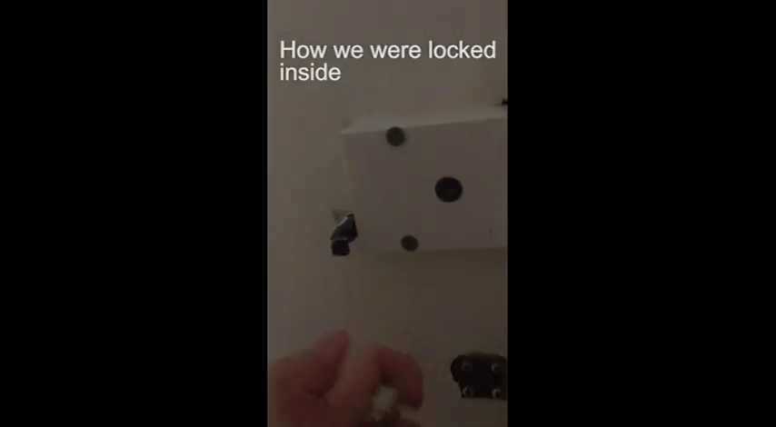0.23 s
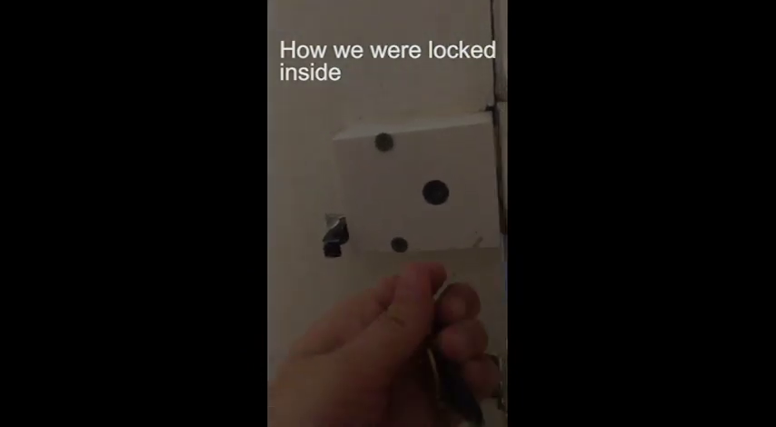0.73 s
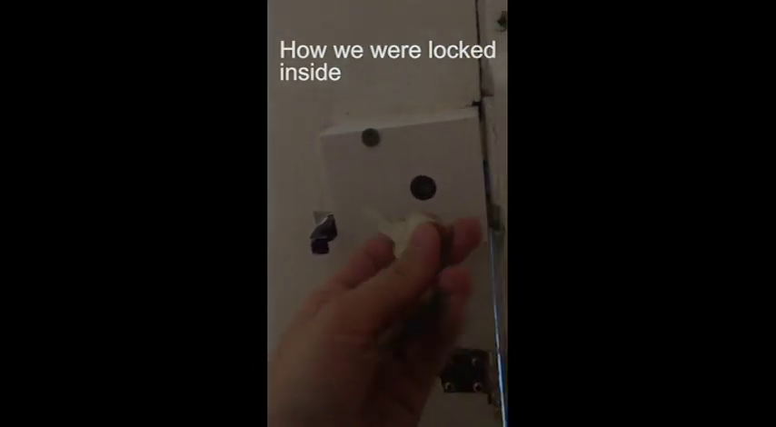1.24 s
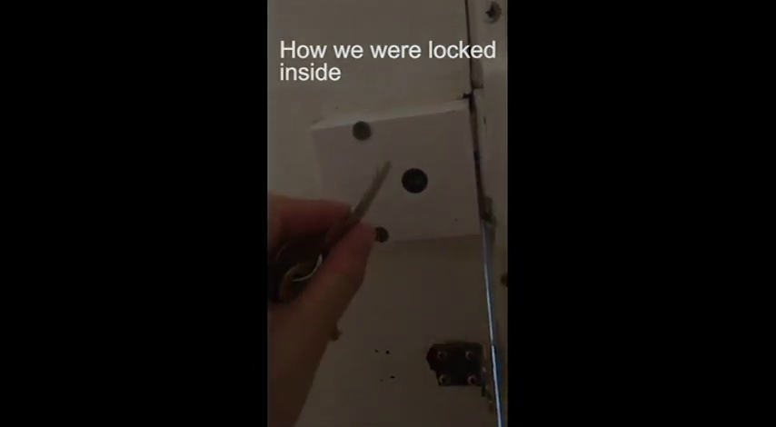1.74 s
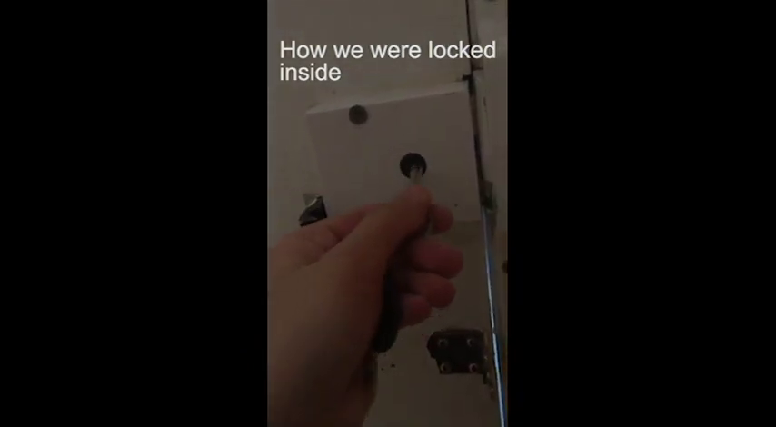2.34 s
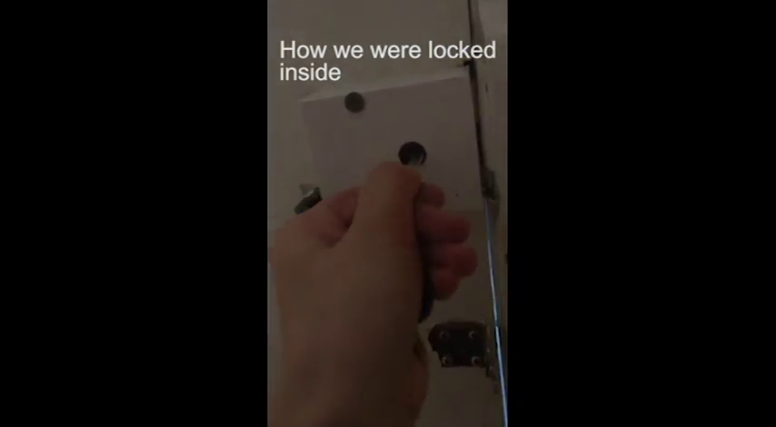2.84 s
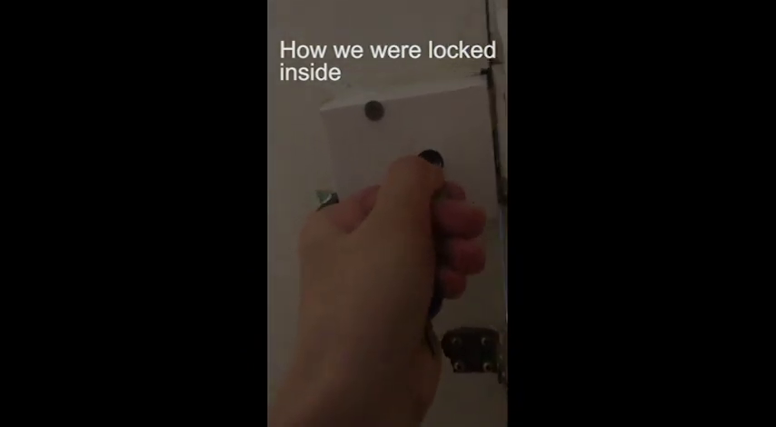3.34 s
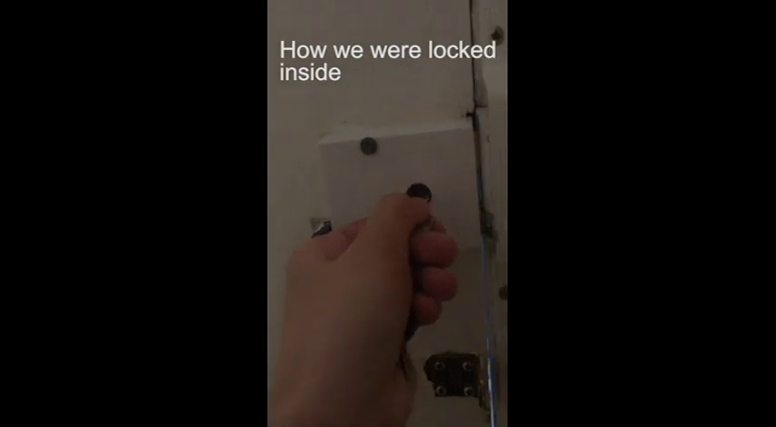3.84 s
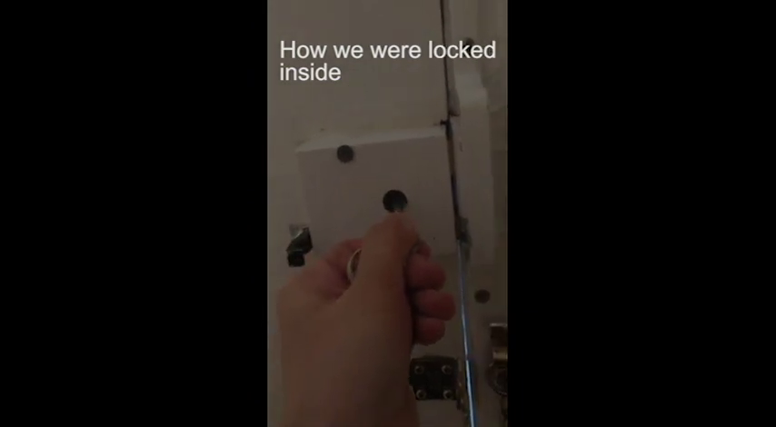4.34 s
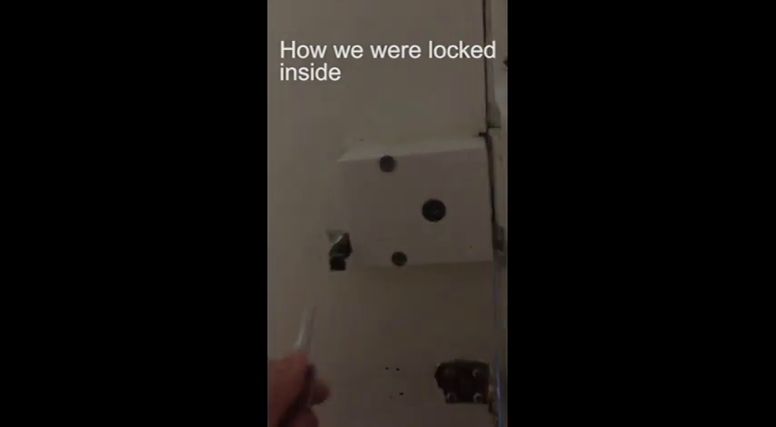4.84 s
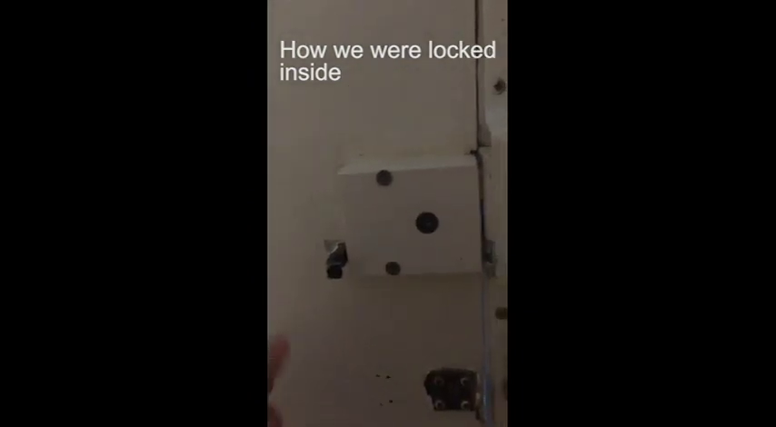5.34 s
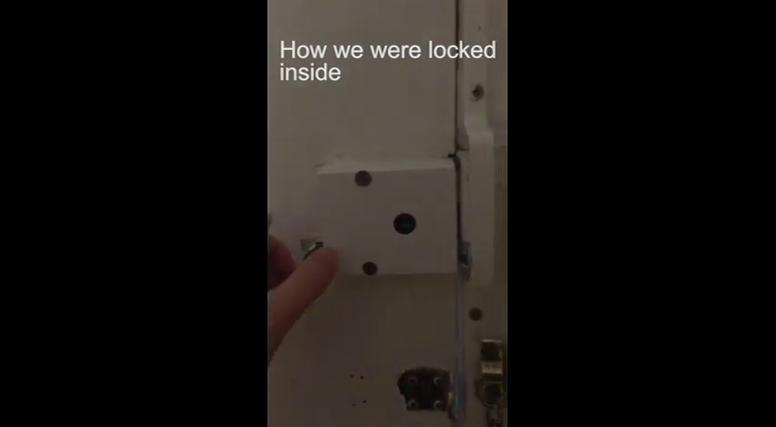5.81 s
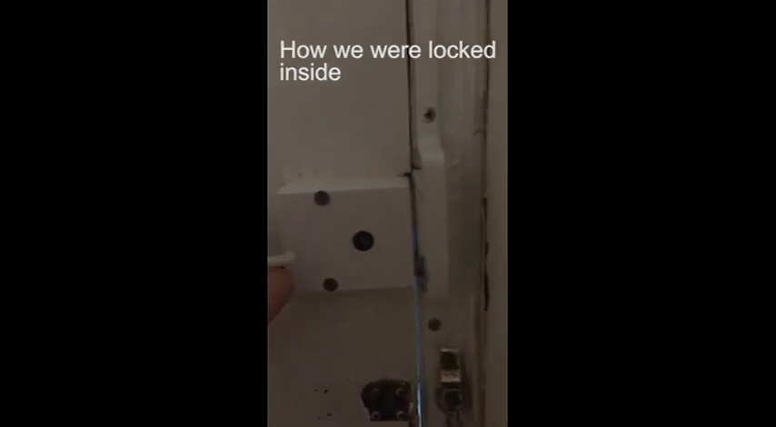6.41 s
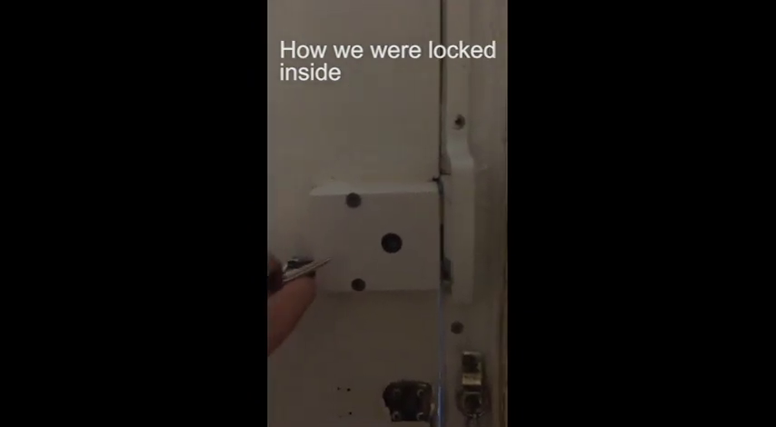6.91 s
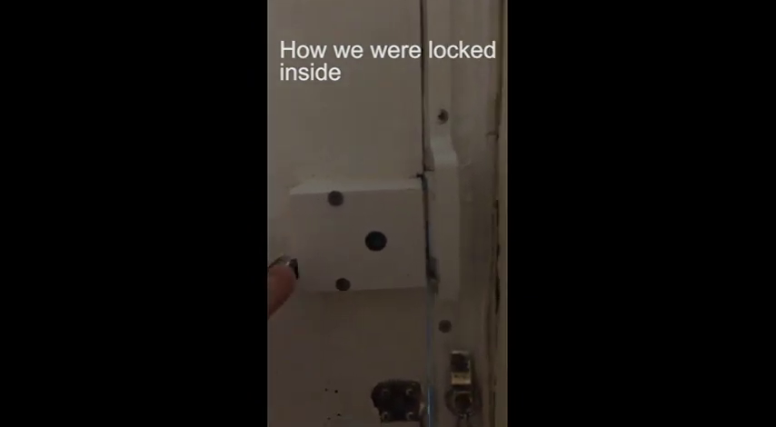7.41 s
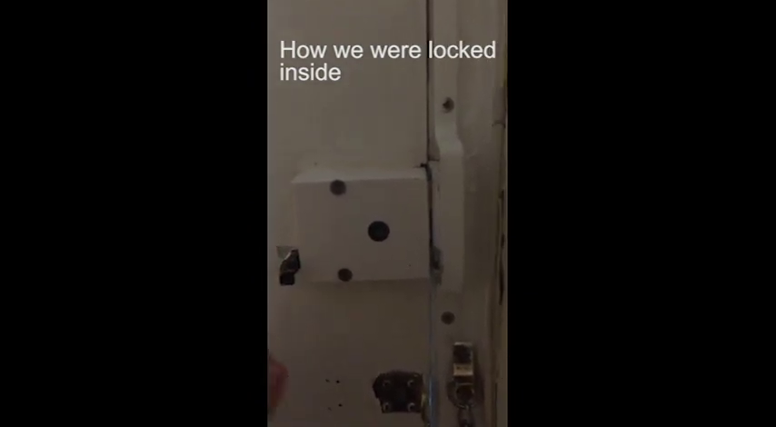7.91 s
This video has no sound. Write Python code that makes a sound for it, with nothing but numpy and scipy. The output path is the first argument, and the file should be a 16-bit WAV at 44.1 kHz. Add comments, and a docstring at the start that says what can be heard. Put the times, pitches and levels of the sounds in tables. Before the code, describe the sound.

Keys jingle in the hand, one is worked into a door lock, the wooden door jolts, and the latch clacks hard in a small hallway.

```python
"""Key in a rim lock

A bunch of keys is sorted in the hand, and one is forced round in the rim lock of a wooden door. The door
shudders, the latch snaps back, the key is pulled out and the lock's catch clacks in a small hard hallway.
Impacts are noisy contact forces driving damped modes, friction is noise gated by tiny slips, and the
hallway is convolution with decaying reflections. Low rumble and still air lie beneath.
"""
import sys
import numpy as np
from scipy import signal
from scipy.fft import rfft, irfft
from scipy.io import wavfile

SR = 44100
rng = np.random.default_rng(int(sys.argv[2]) if len(sys.argv) > 2 else 0)


def store_wav(level_fs):
    """Save 16-bit WAV to argv[1]."""
    pcm = np.round(np.clip(np.atleast_2d(level_fs), -1, 1) * 32767)
    wavfile.write(sys.argv[1], SR, pcm.T.astype(np.int16))


N = 359900  # length in samples


def amp(db):
    """Logarithmic level: 20 dB is a factor of ten in amplitude."""
    return 10 ** (np.asarray(db) / 20)


def rms(x):
    """Effective value: the root of the mean square, kept above zero."""
    return np.sqrt(np.mean(x ** 2) + 1e-24)


def read(points, hz):
    """Interpolation on a log-frequency axis, along which hearing judges pitch."""
    f, value = np.transpose(points)
    return np.interp(np.log(hz + 1), np.log(f), value)


def add(mix, s, sound):
    """Superposition: adds a sound into the mix, in place, from s seconds on."""
    part = mix[max(round(s * SR), 0):][:len(sound)]
    part += sound[:len(part)]


def noise(spectrum):
    """Spectral shaping: white noise filtered to a given colour, at rms 1."""
    white = rng.standard_normal(N)
    gain = amp(read(spectrum, np.fft.rfftfreq(N, 1 / SR)))
    x = irfft(rfft(white) * gain, N)
    return x / rms(x)


def strokes(rows):
    """Power summation: overlapping hand movements, each swelling to a height and fading, as one gain."""
    t = np.arange(N) / SR
    power = sum(amp(db - 20 * abs(t - s) / fade_s) ** 2 for s, db, fade_s in rows)
    return np.sqrt(power)


# still air, relative spectral density: f/Hz, level/dB
AIR_SPECTRUM = [(20, -23), (50, -2.5), (95, 8), (130, -2.5), (240, -5), (400, -20), (1000, -31),
                (3000, -33), (8000, -38.5), (16000, -43.5)]


def air():
    """Stationary noise: the steady background colour of the hallway, at a fixed level."""
    return amp(-56.5) * noise(AIR_SPECTRUM)


# reverberation time of the hallway: f/Hz, t60/s
HALL_T60 = [(60, 0.62), (150, .75), (400, 0.69), (1000, 0.71), (2500, 0.54), (5000, 0.5), (9000, 0.32),
            (15000, 0.38)]


def hall(x, early_db=5.0, early_s=0.022):
    """Reverberation: dense reflections, strongest early from near walls, decay at a rate set by frequency."""
    spacing = 12  # samples; one reflection falls in each slot
    at = np.arange(200, SR - spacing, spacing)
    taps = np.zeros(SR)
    taps[at + rng.integers(0, spacing, len(at))] = rng.choice([-1., 1.], len(at))
    taps *= 1 + amp(early_db) * np.exp(-np.arange(SR) / SR / early_s)
    hz, t, z = signal.stft(taps, SR, nperseg=256)
    decay = amp(-60 * t / read(HALL_T60, hz)[:, None])
    tail = signal.istft(z * decay, SR, nperseg=256)[1]
    return signal.fftconvolve(x, tail / np.linalg.norm(tail))[:N]


# rumble of the leaf, relative spectral density: f/Hz, level/dB
RUMBLE_SPECTRUM = [(20, -24), (42, -2), (60, -5.5), (95, -12), (130, -14), (250, -20.5), (500, -55.5),
                   (1500, -79)]
# the hand leans on the door: t/s at the height, level/dB, time/s to fade by 20 dB
HAND_LEANS = [(.47, -40, .45), (3.18, -28, .2), (4.45, -46, .4), (5.18, -50, .25), (5.82, -36, .1),
              (6.92, -28, .2), (7.23, -32, .25), (8.07, -53, .15)]
SWAY_DB, SWAY_RISE_S, SWAY_FALL_DB_PER_S = -7, .03, 54  # the leaf's rumble after a jolt


def rumble(soft_gain=.8):
    """Forced vibration: the leaf rumbles under the hand and after each jolt, most after soft heavy ones."""
    t = np.arange(2 * SR) / SR
    power = strokes(HAND_LEANS) ** 2
    sway = (1 - np.exp(-t / SWAY_RISE_S)) * amp(SWAY_DB - SWAY_FALL_DB_PER_S * t)
    for s, db, hardness_db in DOOR_JOLTS:
        add(power, s, (amp(db - soft_gain * hardness_db) * sway) ** 2)
    return np.sqrt(power) * noise(RUMBLE_SPECTRUM)


def rub(moves, spectrum, catches_per_s, spread_db, slip_s):
    """Stick-slip friction: surfaces catch and let go in many tiny slips at random times."""
    sizes = amp(spread_db * np.minimum(rng.exponential(1, N), 3))
    slips = (rng.random(N) < catches_per_s / SR) * sizes
    grit = signal.lfilter([1], [1, -np.exp(-1 / (slip_s * SR))], slips)  # each slip dies exponentially
    return strokes(moves) * noise(spectrum) * grit / rms(grit)


# fingers and sleeve brush the door: t/s at the height, level/dB, time/s to fade by 20 dB
DOOR_BRUSHES = [(1.08, -57, .07), (2.79, -46, .1), (2.99, -45, .3), (3.5, -53, .15), (3.88, -58, .3),
                (4.77, -57, .1), (5.15, -58, .15), (6.55, -39, .55)]
# their colour, relative spectral density: f/Hz, level/dB
BRUSH_SPECTRUM = [(120, -17), (250, -1.5), (450, 4.5), (800, -3), (1500, -9), (2800, -13), (5000, -26.5),
                  (12000, -43.5)]


def brushing():
    """Soft friction: fingers and sleeve on wood, with long slips of nearly equal size."""
    return amp(-4.5) * rub(DOOR_BRUSHES, BRUSH_SPECTRUM, catches_per_s=420, spread_db=1.0, slip_s=.006)


# the blade slides over fingers, keys and lock mouth: t/s at the height, level/dB, time/s to fade by 20 dB
BLADE_SLIDES = [(.01, -39, .09), (.26, -51, .15), (.92, -66, .2), (1.08, -53, .05), (1.39, -58, .17),
                (1.57, -55, .05), (1.81, -52, .07), (2.06, -42, .07), (5.35, -43, .06)]
# its colour, relative spectral density: f/Hz, level/dB
SLIDE_SPECTRUM = [(700, -33.5), (1500, -16), (2300, -6), (4000, 2.5), (6800, -0.5), (10000, -5),
                  (16000, -12)]


def sliding():
    """Hard friction: the key blade scrapes in short slips of uneven size."""
    return amp(-4.0) * rub(BLADE_SLIDES, SLIDE_SPECTRUM, catches_per_s=350, spread_db=4.5, slip_s=.0012)


LEAD_S = .004  # a blow grazes for this long before it lands


def ring(modes, t, crack_db, detune):
    """Impulse response: a broad crack and damped modes that vary with grip and point of contact."""
    hz, width, db = np.transpose(modes)[:, :, None]
    hz = hz * (1 + detune * rng.standard_normal(hz.shape))
    place = rng.uniform(.6, 1.4, hz.shape) * rng.choice([-1, 1], hz.shape)
    size = place * amp(db) * 2 * np.pi * width / SR  # a wider mode starts stronger
    response = (size * np.exp(-np.pi * width * t) * np.sin(2 * np.pi * hz * t)).sum(0)
    response[0] += amp(crack_db)
    return response


def chatter(t, spray, t60, first, graze_db, rise, loose_db, loose_s):
    """Contact force: a graze, the main contact with a spray of tiny rebounds, then loose parts buzzing out."""
    t60 = max(t60, .002)
    after = np.maximum(t - LEAD_S, 0)
    graze = amp(graze_db) * (t / LEAD_S) ** 2 * (t < LEAD_S)
    dying = amp(-60 * after / t60) + amp(loose_db - 60 * after / loose_s)
    build = 1 - np.exp(-after / (abs(rise) * t60))  # long contacts build slowly
    force = spray * (graze + dying * build)
    force[int(LEAD_S * SR)] += first  # stands out most in brief contacts
    return force


def strikes(hits, modes, edges, voice, size, attack_s, crack_db, detune, pivot_hz, **contact):
    """Source-filter model: contact force convolved with modes; hardness tilts the bands about the pivot."""
    t = np.arange(size) / SR
    out = np.zeros(N)
    bands = [signal.butter(4, e, "bandpass", fs=SR, output="sos") for e in edges]
    octaves = np.log2(np.array(edges) / pivot_hz).mean(1)  # band centres from the pivot
    for s, db, hardness_db, chatter_s in hits:
        body = ring(modes, t, crack_db, detune)
        spray = rng.standard_normal(size) * np.sqrt(rng.exponential(1, size))
        for sos, octave, (band_db, lag_s, stretch) in zip(bands, octaves, voice):
            force = chatter(t, spray, chatter_s * stretch, **contact)
            part = signal.sosfilt(sos, signal.fftconvolve(force, body)[:size])
            attack = part[:int((attack_s + LEAD_S) * SR)]
            gain = amp(db + band_db + hardness_db * octave) / rms(attack)
            add(out, s + lag_s - LEAD_S, gain * part)
    return out


def strays(spells, spread_db, hardness_db, chatter_s):
    """Jittered point process: small contacts at uneven times, one a slot, as rows of blows."""
    rows = []
    for start, end, per_s, db in spells:
        chance = rng.random((40, 3))
        for k, (when, size, hard) in enumerate(chance):
            s = start + (k + when) / per_s
            if s < end:
                level = db + spread_db * (2 * size - 1)
                hardness = hardness_db + spread_db * (hard - .5)
                rows.append((s, level, hardness, chatter_s))
    return rows


# keys that hang free ring on: t/s, level/dB, favoured f/Hz
FREE_CHIMES = [(.004, -38, 3990), (.057, -30, 14270), (.057, -33, 3990), (.209, -23, 4000),
               (1.14, -56, 5642), (1.153, -52, 14560), (1.153, -52, 10700), (1.196, -51, 10190),
               (1.245, -51, 10190), (2.097, -28, 12000), (5.334, -19, 3800), (5.335, -29, 11900),
               (5.711, -24, 5642), (5.711, -41, 14560), (5.716, -36, 11000), (5.769, -46, 10190),
               (5.898, -47, 11000), (6.735, -44, 5642), (7.783, -55, 10190), (8.146, -55, 5642)]
# their partials: f/Hz, level/dB, t60/s
CHIME_PARTIALS = [(3600, -2, .02), (3990, -2, .035), (5642, 0, .11), (6934, -15, .2), (7375, -13, .18),
                  (10190, -8, .06), (11900, 0, .035), (14270, 0, .14), (14560, -8, .12)]


def chimes(reach_octaves=0.13):
    """Selective excitation: a loose key rings most in the partials near the pitch the blow favours."""
    t = np.arange(SR // 2) / SR
    out = np.zeros(N)
    hz, mode_db, t60 = np.transpose(CHIME_PARTIALS)[:, :, None]
    rise = 1 - np.exp(-t / .0004)
    for s, db, favoured_hz in FREE_CHIMES:
        distance = np.log2(hz / favoured_hz) / reach_octaves
        share = amp(mode_db) / (1 + distance ** 2) ** 2
        partials = share / np.linalg.norm(share) * amp(-60 * t / t60) * np.sin(2 * np.pi * hz * t)
        add(out, s, amp(db) * rise * partials.sum(0))
    return out


# keys knocking together: t/s, level/dB, hardness/dB per octave, chatter t60/s before the stretch
KEY_KNOCKS = [(.026, -41, 1, .019), (.0565, -27, 3, .008), (.058, -42, -9, .008), (.191, -47, -4, .025),
              (.209, -32, .5, .025), (.371, -51, 4, .007), (.424, -53, 0, .015), (.52, -56, -1, .012),
              (.534, -53, 1.5, .005), (.585, -62, -4, .02), (.844, -57, 0, .012), (.862, -40, -1, .01),
              (.904, -44, -2, .0055), (.934, -48, 1, .008), (.963, -53, -1, .018), (1.068, -50, -7, .023),
              (1.077, -48, 2, .0054), (1.196, -60, 9, .015), (1.245, -55, 9, .012), (1.34, -51, 3, .0046),
              (1.384, -47, -4, .021), (1.563, -57, -6, .012), (1.573, -52, -1, .0054),
              (1.706, -52, -1, .009), (1.714, -42, 7, .0085), (1.766, -48, 6, .0075), (1.8, -56, -5, .04),
              (1.812, -41, 0, .022), (1.919, -48, 0, .026), (1.958, -46, -3, .016), (2.039, -49, -4, .037),
              (2.052, -50, 0, .014), (2.078, -51, -3, .006), (2.097, -35, 6, .014), (2.178, -51, -4, .007),
              (4.711, -55, -5, .02), (4.922, -64, -3, .02), (4.985, -48, -5, .022), (5.1, -61, -2, .025),
              (5.321, -45, 2, .0075), (5.334, -34, 3, .012), (5.363, -42, 3, .012), (5.692, -55, 3, .016),
              (5.711, -41, 0, .03), (5.724, -37, -1, .008), (5.769, -44, -4, .018), (5.898, -46, -1, .012),
              (6.735, -44, -6, .011), (6.991, -50, -7, .0044)]
# spells of small stray contacts: start t/s, end t/s, rate/contacts per s, mid level/dB
KEY_SPELLS = [(.82, 1.12, 25, -59), (1.3, 1.6, 20, -63), (1.7, 2.1, 18, -60), (4.8, 5.3, 7, -69)]
# knock, clack, clink and sparkle bands: low f/Hz, high f/Hz
KEY_EDGES = [(650, 2000), (2000, 4600), (4600, 8500), (8500, 16500)]
# their voicing: level/dB, lag/s, chatter stretch/1
KEY_VOICING = [(-21, 0, 1), (0, 0, 1), (.5, 0, .85), (-2.5, 0, .8)]
# the bunch, damped by the fingers: mean f/Hz, width/Hz, level/dB
KEY_RESONANCES = [(930, 940, -7), (2390, 400, -12), (3060, 240, -5.5), (3980, 320, 3), (5265, 300, 0),
                  (6630, 350, -0.5), (7850, 300, -31), (9700, 450, 2.5), (12000, 280, 4), (13470, 150, -6)]


def keys(hits):
    """Heavy damping: keys held in the fingers give short bright clicks from broad modes."""
    return strikes(hits, KEY_RESONANCES, KEY_EDGES, KEY_VOICING, size=3000, attack_s=.0059,
                   crack_db=-12, detune=.037, pivot_hz=6250,
                   first=2.9, graze_db=-18, rise=.031, loose_db=-25, loose_s=.062)


# jolts of the door: t/s, level/dB, hardness/dB per octave
DOOR_JOLTS = [(2.416, -39, 5), (2.783, -29.5, 2), (2.91, -30.5, 2), (2.931, -30, -5), (3.057, -24, -5),
              (3.092, -33, -3), (3.144, -28, -8), (3.442, -42, -2), (3.488, -30, 3), (3.895, -25, 0),
              (3.905, -16.5, .5), (4.579, -19, 1.5), (5.782, -36.5, 2), (5.871, -37, 2), (5.943, -33, -6),
              (6.045, -40, -3), (6.175, -34, 3), (6.215, -32, 7), (6.248, -14, -3), (6.41, -26, 0),
              (6.528, -32, 2), (6.762, -35, 1), (6.839, -28, 2), (7.13, -38, -3), (7.339, -33, 4),
              (7.422, -20, 7), (7.545, -25, 7)]
# heave, boom and knock bands: low f/Hz, high f/Hz
DOOR_EDGES = [(28, 100), (100, 300), (300, 600)]
# their voicing: level/dB, lag/s, chatter stretch/1
DOOR_VOICING = [(-13, 0, 1), (-.3, 0, 1), (-7.5, 0, 1)]
# the wooden leaf: mean f/Hz, width/Hz, level/dB
DOOR_RESONANCES = [(39.5, 8, -6.5), (57.7, 10, -5.5), (78, 12, -5), (145.7, 6.7, 5.5), (176, 16, -2.5),
                   (199, 11, 3.5), (243.9, 9, 3), (282, 10, -2.5), (376, 30, -2), (465, 27, -2),
                   (526, 16, -1.5)]


def door(settle_s=0.058):
    """Plate resonance: the leaf bumps its frame in one solid push and booms in its low modes."""
    hits = [(*row, settle_s) for row in DOOR_JOLTS]
    return strikes(hits, DOOR_RESONANCES, DOOR_EDGES, DOOR_VOICING, size=16000, attack_s=.025,
                   crack_db=-14, detune=.003, pivot_hz=173,
                   first=10.0, graze_db=-20, rise=.1, loose_db=-23.5, loose_s=0.11)


# the sprung catch snaps home: t/s, level/dB
CATCH_SNAPS = [(6.226, -28.5), (7.5435, -14.5)]
# its modes: f/Hz, level/dB, t60/s
CATCH_RESONANCES = [(750, 0, 0.22), (790, 4, 0.031), (820, -14.5, 0.078), (960, -11.5, 0.022)]


def catch():
    """Free vibration: the catch rings in a few low metal modes when its spring lets go."""
    t = np.arange(SR // 2) / SR
    out = np.zeros(N)
    hum = sum(amp(db - 60 * t / t60) * np.sin(2 * np.pi * hz * t) for hz, db, t60 in CATCH_RESONANCES)
    for s, db in CATCH_SNAPS:
        add(out, s, amp(db) * hum)
    return out


# metal blows in the lock: t/s, level/dB, hardness/dB per octave, chatter t60/s before the stretch
LOCK_BLOWS = [(2.417, -30, -1.5, .03), (2.444, -36, 3, .006), (2.517, -45, -5.5, .06),
              (2.722, -56, -5, .04), (2.782, -36, -7, .02), (2.788, -44, 2, .07), (2.806, -42, 2, .013),
              (2.912, -43, -6.5, .036), (2.932, -38, -2, .03), (3.002, -42, -3, .03),
              (3.049, -36, -2, .045), (3.061, -41, 0, .023), (3.138, -42, -1, .06), (3.329, -48, 1, .05),
              (3.341, -49, -4, .04), (3.44, -52, -3, .03), (3.489, -44, -7.5, .04), (3.607, -50, -3, .015),
              (3.857, -53, -4, .016), (3.896, -31, -1, .06), (3.904, -16.5, 2, .024),
              (4.578, -36, 7.5, .022), (4.582, -43, -6.5, .04), (4.765, -62, -7, .03),
              (5.782, -43, -5, .022), (5.872, -46, -5, .02), (5.944, -42, -2, .014), (5.963, -47, 0, .038),
              (6.176, -40, 0, .03), (6.2, -32, 0, .06), (6.207, -18, 3.5, .03), (6.215, -14, 0, .045),
              (6.249, -22, -2.5, .04), (6.356, -39, -3, .012), (6.473, -44, -3, .049),
              (6.524, -15, -1.5, .025), (6.762, -27, -2, .02), (6.812, -38, 2, .045),
              (6.836, -21, -.5, .014), (6.843, -21, -1.5, .04), (7.111, -47, -1, .043),
              (7.338, -46, -4, .022), (7.351, -33, 3, .025), (7.361, -24, -2, .035), (7.405, -17, 2, .005),
              (7.424, -30, 12.5, .016), (7.425, -10, 0, .018), (7.533, -34, 12, .016),
              (7.535, -17, -.5, .02), (8.086, -55, 0, .025)]
# a spell of small grating contacts: start t/s, end t/s, rate/contacts per s, mid level/dB
LOCK_SPELLS = [(2.7, 3.35, 12, -56)]
# clunk, clack, snap and tick bands: low f/Hz, high f/Hz
LOCK_EDGES = [(450, 1200), (1200, 2850), (2850, 8000), (8000, 16500)]
# their voicing, a bright clack that seats with a clunk: level/dB, lag/s, chatter stretch/1
LOCK_VOICING = [(-1.8, .002, 1.35), (.6, 0, .9), (-6, 0, .8), (-18, 0, .65)]
# the lock case: mean f/Hz, width/Hz, level/dB
LOCK_RESONANCES = [(530, 70, -4), (656, 45, -4), (748, 40, -2), (856, 45, -4), (985, 70, -6),
                   (1240, 160, -5), (1486, 60, -4), (1594, 55, -5), (1870, 100, -7), (1994, 50, -6),
                   (2155, 60, -6), (2350, 140, -1), (2600, 90, -1), (2920, 90, -7), (3780, 260, -4),
                   (5120, 160, -8), (7050, 170, -2), (9100, 400, -5), (11300, 400, -8)]


def lock(hits):
    """Modal impact: key, latch and catch strike the steel case and excite its many modes."""
    return strikes(hits, LOCK_RESONANCES, LOCK_EDGES, LOCK_VOICING, size=7000, attack_s=.0063,
                   crack_db=-1, detune=.005, pivot_hz=1850,
                   first=2.7, graze_db=-17, rise=.05, loose_db=-27.5, loose_s=.045)


def scene(count=3):
    """Direct and diffuse sound: sources over rumble and air, the blows ringing differently to each wall."""
    blows = LOCK_BLOWS + strays(LOCK_SPELLS, spread_db=5, hardness_db=-2.5, chatter_s=.03)
    clicks = KEY_KNOCKS + strays(KEY_SPELLS, spread_db=5, hardness_db=-1.5, chatter_s=.02)
    fingers, hum = brushing(), catch()
    loose_keys = chimes() + sliding()
    room = 0
    for _ in range(count):  # each direction has its own blows and reflections; the last is also heard direct
        metal = amp(-4.5) * lock(blows) + hum
        wood = amp(-3.0) * door() + fingers
        bunch = amp(-3.0) * keys(clicks) + loose_keys
        sent = amp(-6.8) * metal + amp(-7.5) * wood + amp(-8.5) * bunch
        room = room + hall(sent) / np.sqrt(count)
    background = amp(-5.5) * rumble() + air()
    return (metal + wood + bunch + room + background)[None]


def record(dry):
    """Band limiting and saturation: the microphone drops deep bass, overloads softly and loses the top."""
    heard = signal.sosfilt(signal.butter(4, 33, "highpass", fs=SR, output="sos"), dry)
    limited = heard / (1 + (heard / .72) ** 4) ** (1 / 4)  # levels off towards .72
    lowpass = signal.firwin(255, 16000, window=("kaiser", 8), fs=SR)
    return signal.oaconvolve(limited, lowpass[None], "same")


dry = scene()
out = record(dry)
store_wav(out)
```